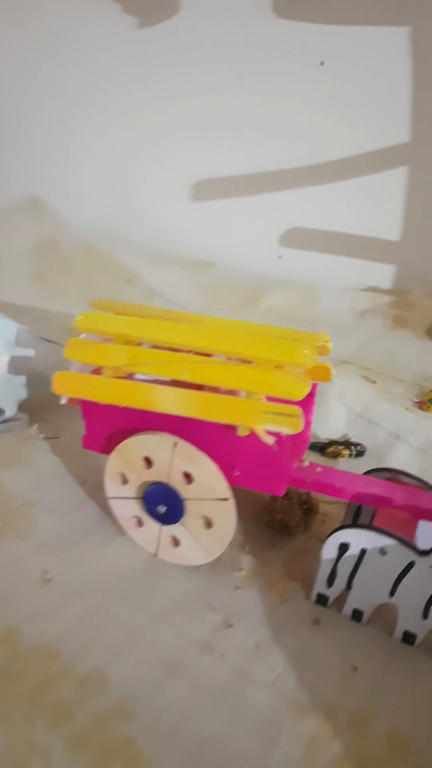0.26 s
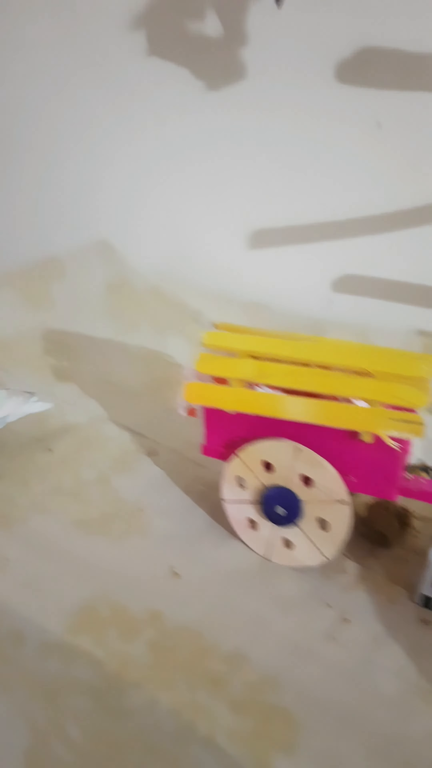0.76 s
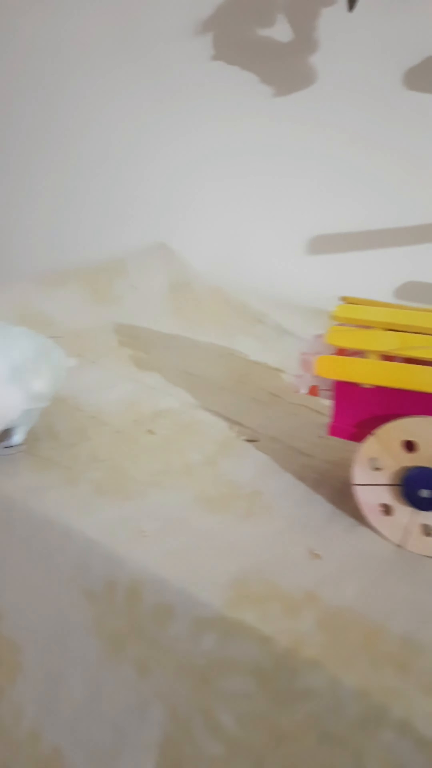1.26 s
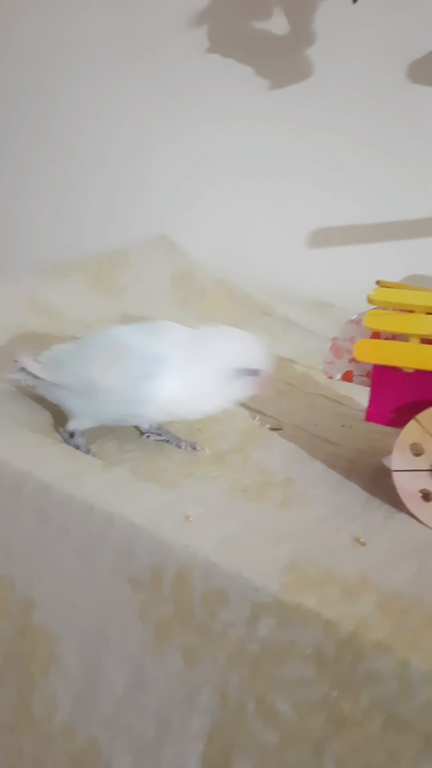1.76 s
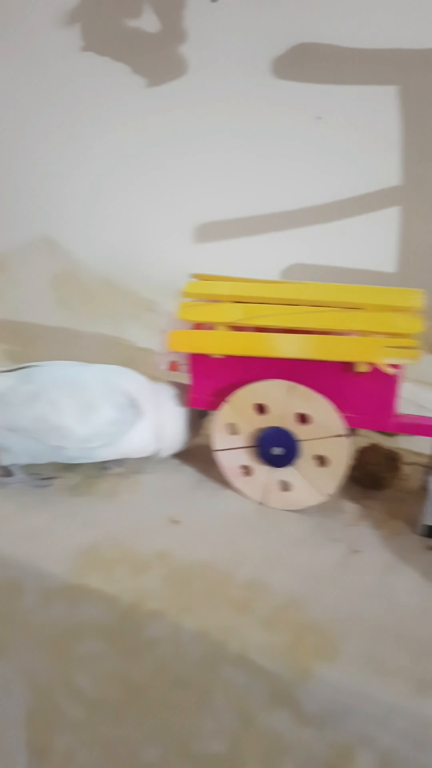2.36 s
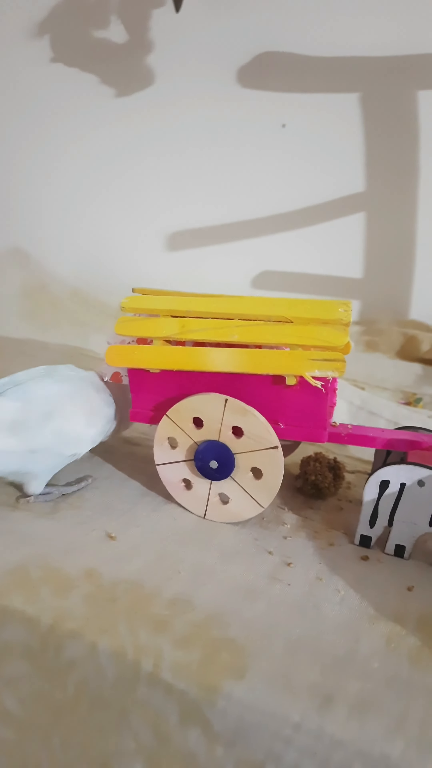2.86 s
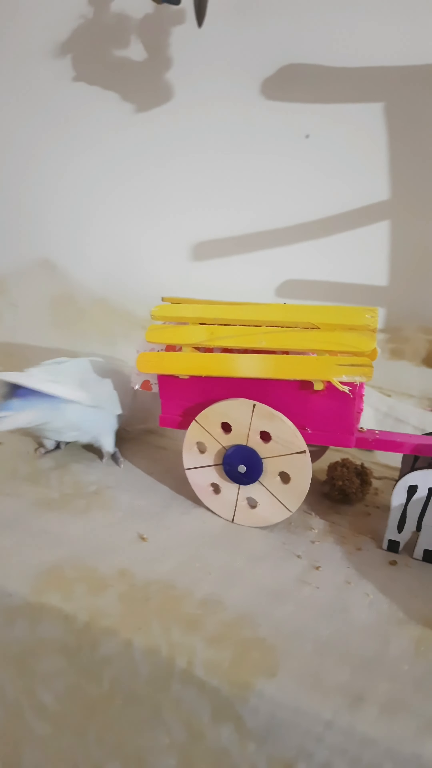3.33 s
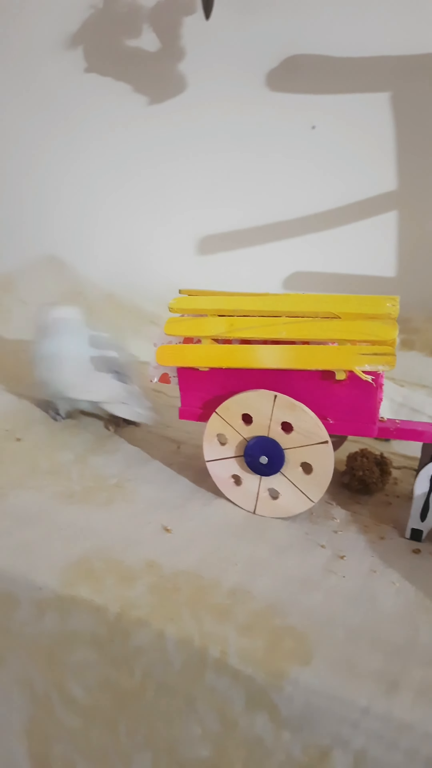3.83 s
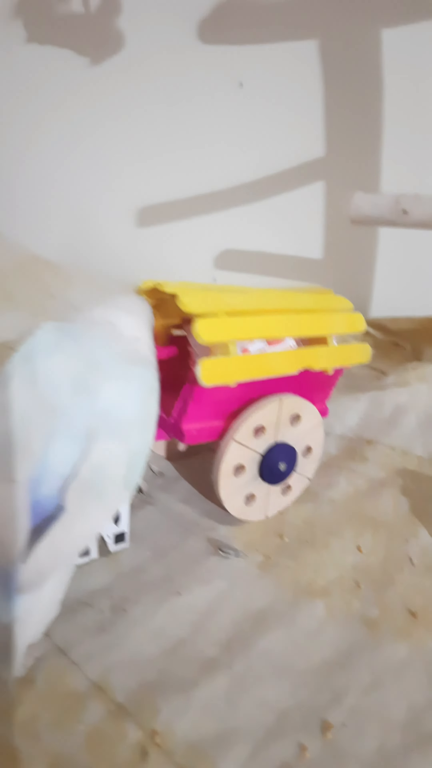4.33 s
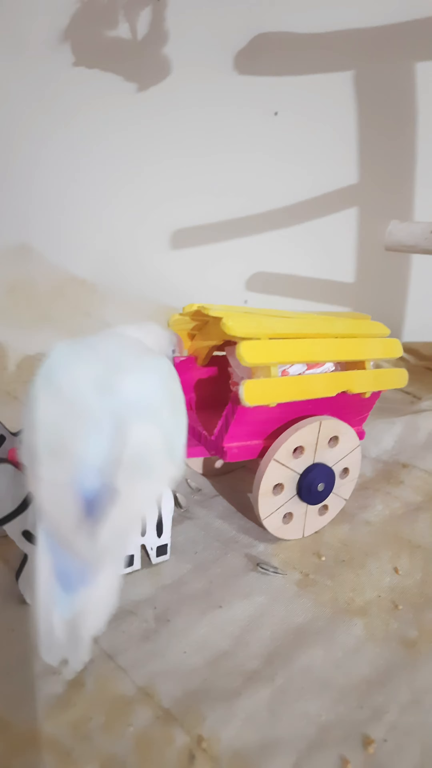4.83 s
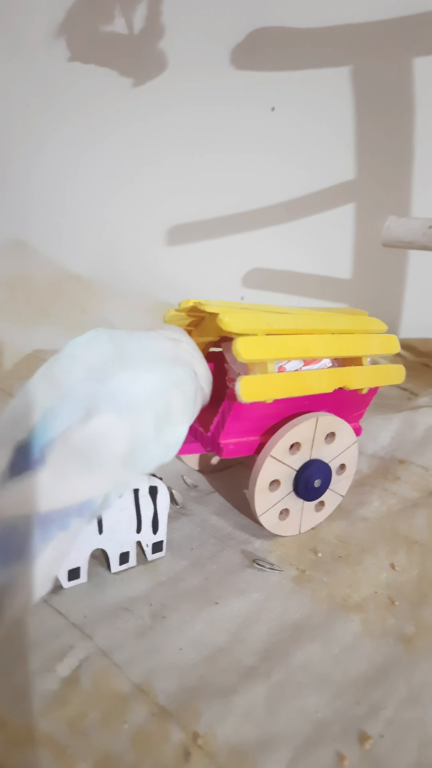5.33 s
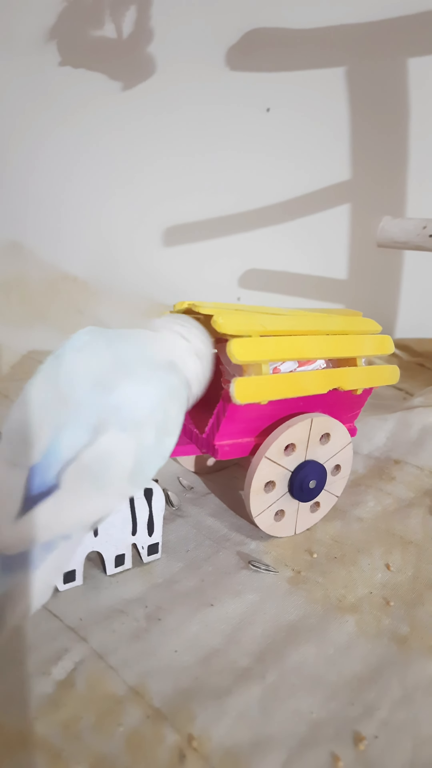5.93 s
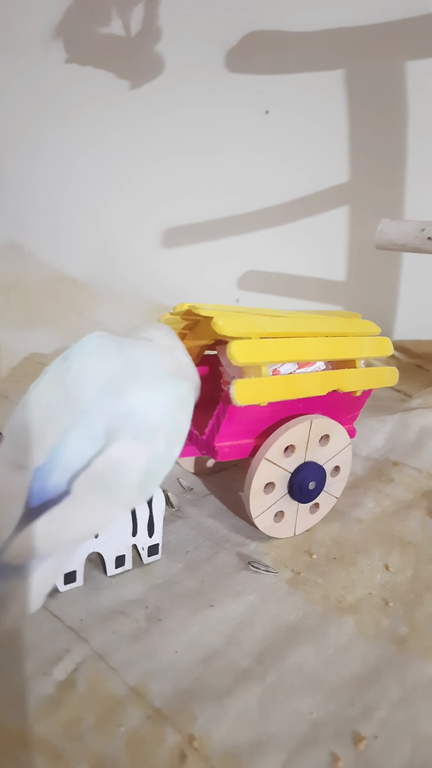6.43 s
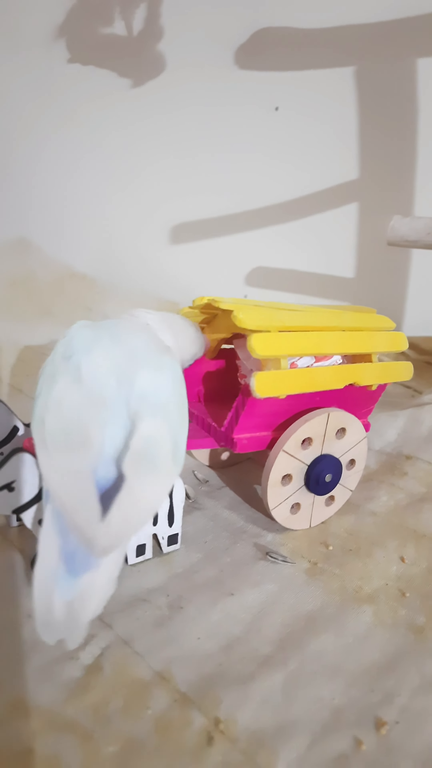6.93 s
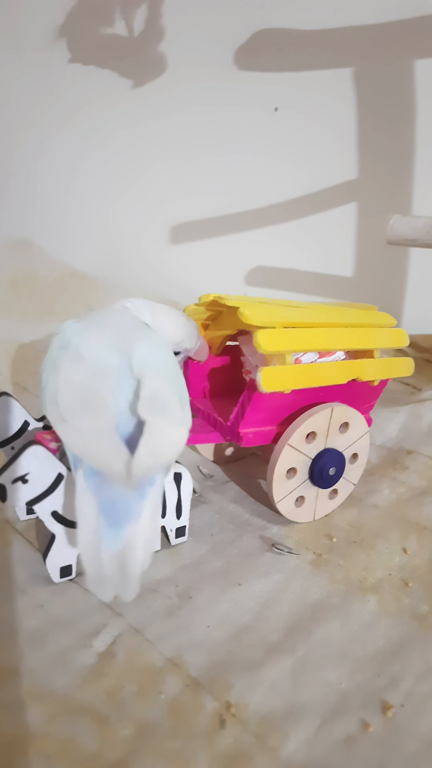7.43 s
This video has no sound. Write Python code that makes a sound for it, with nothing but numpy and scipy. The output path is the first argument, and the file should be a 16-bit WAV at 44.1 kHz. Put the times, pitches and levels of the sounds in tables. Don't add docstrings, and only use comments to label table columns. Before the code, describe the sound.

Small parrots shriek, pipe and chatter in a ringing bare room, then one bird gnaws thin wooden sticks with faint ticks and soft peeps.

```python
import sys
import numpy as np
from scipy import signal
from scipy.io import wavfile
from scipy.ndimage import uniform_filter1d, map_coordinates

SR = 44100
rng = np.random.default_rng(int(sys.argv[2]) if len(sys.argv) > 2 else 0)


def unload_audio(sound):
    columns = np.transpose(np.atleast_2d(sound))
    steps = np.round(np.clip(columns, -1, 1) * 32767)
    wavfile.write(sys.argv[1], SR, steps.astype(np.int16))


def makeup_ratio(level_db):
    decades = np.asarray(level_db, float) / 20
    return 10 ** decades


N = 339129
CHANGE_S = 3.998


def unit(x):
    return x / np.sqrt(np.mean(x ** 2))


def band(x, hz, width):
    return signal.lfilter(*signal.iirpeak(hz, hz / width, SR), x)


def walk(rate, size):
    hold = max(int(SR / rate), 1)
    steps = np.repeat(rng.standard_normal(size // hold + 1), hold)
    return 1.317 * uniform_filter1d(uniform_filter1d(steps, hold), hold)[:size]


def curve(rows, t):
    s, *columns = np.transpose(rows)
    return [np.interp(t, s, c) for c in columns]


def syrinx(rough, second_db, fall_db, rows, puff):
    t = np.arange(rows[0][0] - .002, rows[-1][0] + 0.0031 + 0.018 * rough, 1 / SR)
    hz, db = curve(rows, t)
    size = len(t)
    wavering_hz = uniform_filter1d(hz, size=SR // 500) * (1 + .012 * walk(150, size))
    phase = 2 * np.pi * np.cumsum(wavering_hz) / SR
    stack = 0
    for k in range(1, 7):
        smear = min(rough * (0.4 + .9 * k), 1)
        spread = hz.mean() * (.12 + .7 * rough ** 2) * k ** 0.64
        blur = walk(spread, size) * np.sin(k * phase) + walk(spread, size) * np.cos(k * phase)
        partial = np.sqrt(1 - smear) * np.sin(k * phase) + np.sqrt(smear / 2) * blur
        partial_db = (k > 1) * (second_db + fall_db * (k - 2))
        stack = stack + partial * makeup_ratio(partial_db) * (k * hz < 15300)
    pulse_phase = 2 * np.pi * np.cumsum(260 * (1 + 0.3 * walk(79.9, size))) / SR
    pulses = 1 + .8 * rough * np.sin(pulse_phase)

    hiss = unit(band(band(rng.standard_normal(size), 4500, 8000), 4500, 8000))
    air = makeup_ratio(-16.5 + 0.46 * second_db + 10 * rough) * hiss
    above_voice = signal.butter(4, 0.85 * hz.min(), "high", fs=SR, output="sos")
    air = signal.sosfilt(above_voice, air)
    air = air * (1 + puff * np.exp(-((t - t[0] - .008) / 0.0053) ** 2))

    opening = (t - t[0]) / (0.0012 + 0.0039 * rough)
    closing = (t[-1] - t) / (0.0017 + 0.011 * rough)
    edges = np.clip(np.minimum(opening, closing), 0, 1)
    ragged = makeup_ratio(5 * rough * walk(70, size))
    return np.sqrt(2) * makeup_ratio(db) * edges * pulses * ragged * (stack + air)


def add(out, x, s, lag):
    for side, shift in enumerate((lag / 2, -lag / 2)):
        start = max(int(s * SR + shift), 0)
        out[side, start:start + len(x)] += makeup_ratio(-.13 * shift) * x[:N - start]


def birds(calls):
    out = np.zeros((2, N))
    for voice, rows in calls:
        puff = voice.get("puff", 2.2)
        sound = syrinx(voice["rough"], voice["second_db"], voice["fall_db"], rows, puff)
        add(out, sound, rows[0][0] - .002, voice["lag"])
    return out


def contours(notes, peak, glided, onset_db, fade_db, **voice):
    calls = []
    for s, length, first, last, db in notes:
        onset = (s, first, db + onset_db)
        top = (s + peak * length, first + glided * (last - first), db)
        calls.append((voice, [onset, top, (s + length, last, db + fade_db)]))
    return calls


def sung(tables):
    return sum((contours(notes, **way) for notes, way in tables), [])


SHRILL = dict(rough=0.06, second_db=1.5, fall_db=-5.5, lag=-8.4, puff=1.5)
ROUNDED = dict(rough=0.22, second_db=3, fall_db=-13.5, lag=-8.4, puff=0)
SHOUT = dict(rough=.4, second_db=-9.5, fall_db=-5, lag=-8,
             peak=0.58, glided=0.77, onset_db=2.5, fade_db=-11.5)
# (time [s], pitch [Hz], level [dB])
SHRILL_CALLS = [
    [(.016, 2200, -33.5), (.022, 2223, -26.5), (.032, 2130, -24), (.042, 2300, -30)],
    [(.167, 2725, -25), (.171, 2355, -30), (.176, 2450, -18.5), (.18, 2910, -14), (.185, 3310, -18),
     (.193, 3660, -19), (.203, 2840, -24.5)],
    [(.208, 3290, -25), (.214, 2750, -24)],
]
# (time [s], pitch [Hz], level [dB])
ROUNDED_CALL = [(.045, 2720, -27.5), (0.053, 3290, -20), (.06, 3800, -21.5), (0.069, 3440, -25.5),
                (0.071, 3050, -28.5)]
# (time [s], length [s], first pitch [Hz],
# # last pitch [Hz], level [dB])
SHOUTS = [(0.08, 0.034, 3000, 3100, -25.5), (.002, 0.067, 4000, 3800, -37.5),
          (.221, 0.012, 6300, 5400, -18), (.233, .028, 4500, 4000, -15.5), (.2, .03, 4400, 2750, -23.5),
          (.235, .06, 2900, 2850, -30)]


def near_bird():
    shrieks = [(SHRILL, rows) for rows in SHRILL_CALLS]
    return birds(shrieks + [(ROUNDED, ROUNDED_CALL)] + contours(SHOUTS, **SHOUT))


RASPED = dict(rough=0.49, second_db=1, fall_db=-10, lag=2.8, puff=0)
CLACK = dict(rough=0.044, second_db=-19.5, fall_db=-15, lag=3, puff=9)
PIPING = dict(rough=0.078, second_db=-6, fall_db=-7.5, lag=3, puff=0)
SLIDING = dict(rough=0.15, second_db=-10.5, fall_db=-6.5, lag=6, puff=0)
# (time [s], pitch [Hz], level [dB])
RASPED_CALL = [(1.008, 5300, -41), (1.013, 5760, -37.5), (1.019, 5200, -41)]
# (time [s], pitch [Hz], level [dB])
CLACK_CALL = [(2.2609, 5240, -24.5), (2.263, 4210, -25.5)]
# (time [s], pitch [Hz], level [dB])
PIPING_CALLS = [
    [(1.02, 4150, -34), (1.024, 3980, -28.5), (1.031, 4010, -21.5), (1.039, 5080, -24), (1.046, 4650, -25),
     (1.053, 5190, -20.5), (1.06, 5118, -33)],
    [(1.077, 4130, -26), (1.088, 3950, -19.5), (1.1, 3975, -38)],
]
# (time [s], pitch [Hz], level [dB])
SLIDING_CALLS = [
    [(1.069, 3490, -32), (1.072, 2500, -16), (1.076, 2480, -34)],
    [(1.103, 3140, -23.5), (1.108, 2826, -20), (1.116, 2673, -26.5), (1.127, 1850, -27.5)],
    [(1.133, 1840, -33), (1.139, 1430, -35.5), (1.146, 1630, -49)],
]


def middle_bird():
    pipes = [(PIPING, rows) for rows in PIPING_CALLS]
    slides = [(SLIDING, rows) for rows in SLIDING_CALLS]
    return birds([(RASPED, RASPED_CALL), (CLACK, CLACK_CALL)] + pipes + slides)


FLUTED = dict(rough=0.2, second_db=-13, fall_db=-10, lag=9.6)
CLEAR = dict(rough=0.18, second_db=-7.5, fall_db=-9, lag=1.8,
             peak=0.4, glided=0.63, onset_db=2, fade_db=-1)
SOFT = dict(rough=0.276, second_db=-29, fall_db=-75, lag=3.9,
            peak=0.27, glided=0.626, onset_db=1.5, fade_db=-7.5)
HUSKY = dict(rough=0.52, second_db=-17.5, fall_db=-5.5, lag=9, puff=0.85,
             peak=0.39, glided=0.53, onset_db=7, fade_db=6)
HOARSE = dict(rough=.85, second_db=-15.5, fall_db=-18.5, lag=10, puff=.7,
              peak=0.62, glided=0.6, onset_db=-2.5, fade_db=-8.5)
SWELLING = dict(rough=.55, second_db=-38, fall_db=-19, lag=8.9, puff=0,
                peak=.7, glided=0.62, onset_db=-4, fade_db=-9)
WHISTLED = dict(rough=0.078, second_db=-13, fall_db=-2.5, lag=2, puff=0,
                peak=0.48, glided=.75, onset_db=-11, fade_db=-8.5)
CHIPPED = dict(rough=0.23, second_db=-10, fall_db=-12, lag=9, puff=1,
               peak=0.285, glided=0.88, onset_db=6, fade_db=-7)
CHATTY = dict(rough=0.16, second_db=4.5, fall_db=-5.5, lag=9, puff=4.2,
              peak=0.5, glided=.65, onset_db=-4, fade_db=-4)
# (time [s], pitch [Hz], level [dB])
FLUTED_CALL = [(1.793, 5500, -53), (1.798, 5284, -38.5), (1.808, 3533, -39), (1.818, 3645, -36),
               (1.834, 4720, -45), (1.838, 4560, -39), (1.848, 3664, -34.5), (1.858, 2500, -40)]
# (time [s], length [s], first pitch [Hz], last pitch [Hz], level [dB])
CLEAR_NOTES = [(1.635, 0.058, 1305, 1318, -56), (1.797, 0.069, 1141, 1720, -49.5),
               (2.005, 0.024, 966, 1310, -53), (2.207, 0.021, 2774, 3100, -42.5),
               (2.4, 0.0655, 1206, 1037, -54.5), (2.485, 0.078, 1060, 993, -57.5),
               (3.925, 0.078, 986, 946, -62)]
SOFT_NOTES = [(.5, 0.1, 1877, 1757, -50), (.66, 0.061, 2076, 1978, -51), (.8, 0.052, 1777, 1787, -52),
              (.9, 0.058, 1896, 1847, -52), (1.352, 0.026, 3600, 3670, -48.5),
              (1.46, 0.043, 2487, 2880, -52), (1.61, 0.019, 2200, 2255, -53.5), (2.05, 0.19, 819, 868, -62),
              (2.8, 0.036, 5580, 5700, -34)]
HUSKY_NOTES = [(.415, 0.036, 3560, 3570, -39), (1.14, 0.03, 3450, 3940, -35.5),
               (1.18, .025, 3750, 3767, -37), (1.175, 0.045, 1650, 2265, -40),
               (1.86, 0.035, 2294, 2570, -42), (1.91, 0.059, 2870, 2760, -55),
               (2.41, 0.067, 2390, 2300, -55), (2.53, 0.079, 2300, 2270, -59),
               (2.665, 0.108, 1683, 1770, -50), (2.905, 0.076, 2300, 1960, -44.5),
               (2.965, 0.017, 4610, 3450, -44), (3.92, 0.075, 3850, 3850, -71),
               (1.94, .04, 2850, 2750, -56)]
HOARSE_NOTES = [(.27, 0.1, 4180, 4730, -38.5), (.41, .05, 2472, 1800, -36.5), (.29, .1, 2900, 2703, -37.5),
                (.365, 0.1, 4600, 1850, -34.5), (1.19, 0.059, 5350, 5780, -33),
                (3.03, .105, 4117, 4720, -35.5), (3.03, 0.13, 1720, 2203, -42.5),
                (3.03, 0.1, 6200, 6640, -34), (3.04, 0.2, 2820, 2807, -39.5),
                (3.135, 0.28, 4600, 2415, -43.5), (3.2, 0.017, 4570, 4600, -38.5),
                (3.205, 0.039, 2198, 2860, -35.5), (3.29, 0.016, 3380, 4110, -60),
                (3.25, 0.25, 1616, 1520, -54), (3.79, 0.047, 1613, 1515, -53.5)]
SWELLING_NOTES = [(3.742, .03, 2600, 2500, -54), (3.77, .018, 3300, 4000, -46.5),
                  (3.767, 0.022, 1550, 1500, -41.5), (3.78, 0.0153, 3000, 2400, -49),
                  (3.325, 0.0507, 2500, 2150, -31.5), (3.37, 0.088, 2200, 2200, -40.5),
                  (3.1, 0.029, 3800, 3100, -45.5), (3.225, 0.054, 3100, 1800, -35)]
WHISTLES = [
    (2.035, .1, 1704, 1958, -38.5),
]
CHIPS = [(3.498, 0.013, 2750, 2950, -40), (3.508, 0.037, 2980, 2950, -42), (3.2, .012, 4800, 3700, -52),
         (3.53, .035, 2500, 2050, -53), (2.5, 0.0715, 1500, 1900, -50.5), (3.2, 0.036, 1400, 1700, -57),
         (3.74, .02, 1180, 1100, -55), (3.5, 0.073, 1850, 1980, -62), (3.1, .035, 2600, 2400, -60),
         (1.255, 0.027, 2950, 3400, -39), (1.31, 0.033, 2400, 2500, -45.5)]
# (time [s], length [s], top pitch [Hz], level [dB])
CHATTER = [(2.335, 0.014, 2240, -49), (2.391, 0.015, 2520, -45.5), (2.446, 0.019, 2330, -39.5),
           (2.509, 0.022, 2550, -40.5), (2.576, 0.019, 2447, -42), (2.657, 0.015, 2370, -42),
           (2.723, .022, 2367, -37.5), (2.787, 0.015, 2950, -38), (2.839, .011, 2600, -41.5),
           (2.9, 0.013, 2730, -38.5)]


def flock():
    chatter = [(s, length, 1500, top, db) for s, length, top, db in CHATTER]
    kinds = [(CLEAR_NOTES, CLEAR), (SOFT_NOTES, SOFT), (HUSKY_NOTES, HUSKY), (HOARSE_NOTES, HOARSE),
             (SWELLING_NOTES, SWELLING), (WHISTLES, WHISTLED), (CHIPS, CHIPPED), (chatter, CHATTY)]
    return birds([(FLUTED, FLUTED_CALL)] + sung(kinds))


def stick_resonances():
    """Placeholder name for the wood's modes is not needed: see stick()."""


# (frequency [Hz], width [Hz], level [dB])
STICK = [(2300, 880, 14.5), (4600, 1400, 8), (5970, 820, 3.5), (7920, 700, 5), (9780, 580, 7),
         (13100, 850, 3), (15000, 4700, -7)]


def stick(top, body):
    out = 0
    for k, (hz, width, db) in enumerate(STICK):
        drive = body if k < 2 else top
        out = out + (-1) ** k * makeup_ratio(db) * band(drive, hz, width)
    return out


# (time [s], peak level [dB], body 1.5-4 kHz minus top [dB], left minus right [dB])
TICKS = [(1.522, -55, -31, -18), (2.2213, -42, -2.5, 5), (3.4927, -48, 9, -13), (4.036, -57.5, -19, -5),
         (4.9681, -49, -27, 7), (4.9944, -61.5, -6.5, 4.5), (5.033, -58, -9, 4), (5.08, -61, -1, 5),
         (5.19, -63, -5, -1), (5.4794, -60.5, -14, -7.5), (5.6361, -59.5, -5, 1), (5.7294, -63, -11, -6.5),
         (5.891, -62, -2, -3), (5.96, -64, 4, -15), (5.999, -56, -12, -3), (6.0191, -50, -11.5, -17),
         (6.096, -61.5, -17.5, -20), (6.174, -48, -2.5, -11), (6.2128, -53, -9.5, -19),
         (6.2916, -59, -10, -20.5), (6.4774, -61, -4.5, -17), (6.4994, -50, -14, -23.5),
         (6.532, -46, -37, -19), (6.9572, -59, -15, 4), (7.1688, -58.5, -16, -5),
         (7.216, -58, -15.5, -16.5), (7.4715, -54, -13, -8), (7.5103, -56.5, -19, -7)]
# (time [s], length [s], level [dB], body minus top [dB])
TEAR = [(0.782, 0.036, -59.5, -5), (0.936, .03, -66, -21), (4.382, 0.059, -79.5, 5.5),
        (4.54, .05, -76, -3.5), (4.961, 0.14, -70, -11), (5.166, 0.088, -57, -11.5),
        (5.48, 0.12, -65.5, -11), (5.645, 0.025, -57.5, -1), (5.681, 0.13, -59.5, -10),
        (5.884, 0.017, -66, -9), (5.899, 0.15, -75.5, 5), (5.944, 0.0067, -70, -4),
        (6.066, 0.13, -64.5, -7.5), (6.168, 0.096, -71, 2), (6.402, 0.13, -64, -7), (6.512, .015, -61, -3),
        (6.527, 0.03, -48, -12.5), (6.568, 0.052, -59, -8), (6.63, 0.1, -63, -7.5), (6.95, .1, -68.5, -7),
        (7.184, 0.091, -61, -27), (7.46, 0.096, -69.5, -13.5)]
# (time [s], level [dB])
STIR = [(0, -41), (.72, -72), (.8, -74.5), (1.5, -65), (1.78, -67.5), (1.87, -50), (2.0, -57), (2.19, -70),
        (2.3, -54), (2.75, -54), (3.2, -52), (3.5, -60.5), (3.6, -63), (3.73, -68), (3.79, -54),
        (3.85, -63.5), (4.0, -67)]


def gnawing():
    t = np.arange(N) / SR
    top, body = np.zeros((2, N)), np.zeros((2, N))
    snap = np.exp(-np.arange(120) / 164.0)
    for s, db, body_db, pan_db in TICKS:
        port_db = db + 1.0 + np.array([[pan_db], [-pan_db]]) / 2
        burst = makeup_ratio(port_db) * snap * rng.standard_normal(120)
        at = slice(int(s * SR), int(s * SR) + 120)
        top[:, at], body[:, at] = burst, burst * makeup_ratio(body_db)

    struck = rng.random((2, N)) < 7000 / SR
    strength = makeup_ratio(np.minimum(1.8 * rng.exponential(size=(2, N)), 6))
    breaks = struck * strength * rng.standard_normal((2, N))
    breaks = unit(breaks + .6 * breaks[::-1]) * makeup_ratio(2.5 * walk(90, N))

    pull = (t < CHANGE_S) * makeup_ratio(curve(STIR, t)[0])
    pull_body = pull * makeup_ratio(1.0)
    for s, length, db, body_db in TEAR:
        at = slice(int(s * SR), int(s * SR) + SR // 2)
        age = t[at] - s
        thinning_db = 4.65 * np.clip(age / length, 0, 1) + 280 * np.clip(age - length, 0, 1)
        shape = np.clip(age / 0.0033, 0, 1) * makeup_ratio(db - thinning_db)
        pull[at] += shape
        pull_body[at] += shape * makeup_ratio(body_db)
    return stick(top + pull * breaks, body + pull_body * breaks)


PEEPY = dict(rough=0.332, second_db=-10.5, fall_db=-4, lag=4.5, puff=1.8,
             peak=0.297, glided=0.402, onset_db=-4, fade_db=-8.5)
REEDY = dict(rough=0.16, second_db=-4, fall_db=-3, lag=4.5, puff=2,
             peak=0.392, glided=.8, onset_db=0.5, fade_db=-1)
# (time [s], length [s], first pitch [Hz], last pitch [Hz], level [dB])
PEEPS = [(4.995, 0.077, 1400, 1400, -60), (5.17, 0.024, 1026, 1067, -58), (5.37, 0.075, 1362, 1364, -58),
         (5.7, 0.024, 1710, 1726, -53), (5.722, 0.089, 1663, 1400, -54), (5.888, 0.019, 1450, 1510, -52),
         (5.92, 0.029, 1500, 1520, -56), (5.96, 0.066, 1242, 1327, -53), (6.175, 0.016, 2035, 2254, -53),
         (6.18, 0.094, 2875, 2780, -61), (6.22, .06, 2150, 2150, -65.5), (6.53, 0.0251, 2650, 2330, -56),
         (6.545, 0.059, 1178, 1220, -52), (6.59, 0.049, 1380, 1440, -58)]
# (time [s], length [s], first pitch [Hz], last pitch [Hz], level [dB])
REEDY_PEEPS = [
    (5.634, 0.0214, 1017, 1132, -50.5),
    (5.65, 0.048, 1500, 1700, -54),
]


def gnawer_peeps():
    return birds(sung([(PEEPS, PEEPY), (REEDY_PEEPS, REEDY)]))


def ledge(x):
    return np.array([port + makeup_ratio(-6.5) * np.roll(port, lag) for port, lag in zip(x, (83, 131))])


# (frequency [Hz], decay by 60 dB [s], level [dB])
ROOM = [(731, 0.87, -6), (1400, 0.77, -6), (2000, 0.87, -7.5), (2650, 0.5, -3), (3400, 0.42, 1.5),
        (4450, 0.35, -7.5), (6230, 0.35, 1.5), (8870, 0.33, 4), (13130, 0.31, -5)]


def room(x, lag):
    t = np.arange(int(1.2 * SR)) / SR
    rise = np.clip((t - .003) / 0.0026, 0, 1)
    tail = 0
    for hz, t60, db in ROOM:
        ring = band(rng.standard_normal((2, len(t))), hz, .5 * hz) / np.sqrt(hz)
        tail = tail + makeup_ratio(db - 60 * t / t60) * ring
    tail = rise * (tail + .25 * tail[::-1])
    tail = np.array([np.roll(tail[0], lag), tail[1]])
    tail = tail / np.sqrt(np.sum(tail ** 2) / 2) / 2
    flutter = 8e-5 * SR * walk(200, N)
    wavering = map_coordinates(x[0], [np.arange(N) + flutter], order=1)
    return signal.fftconvolve(wavering[None], tail, axes=1)[:, :N]


# (frequency [Hz], level [dB per Hz])
HUSH = [(25, -47), (33, -45), (45, -25.5), (70, -16), (95, -22), (150, -13), (206, -26.5), (263, -7),
        (400, -30), (734, -28), (1740, -38.5), (2840, -54), (3500, -54.5), (6000, -55), (9000, -54),
        (16000, -63)]
# (time [s], level [dB])
DUCK = [(0, 3.5), (.3, -1.5), (.55, -3), (.95, -4), (1.3, -2), (1.7, -0.5), (2.3, 1), (3.2, 1.5),
        (3.7, -0.5), (7.69, -1)]
# (frequency [Hz], width [Hz], steady level [dB], wobbling level [dB])
HUM = [(64.1, 3, -14, -14), (119.4, 9, -28, -5), (130, 2.9, -0.5, -8), (235.6, 35, -21.5, -17)]
# (time [s], level [dB])
SWELL = [(0.0, -44), (0.41, -50.5), (2.93, -45), (3.08, -49), (6.87, -46.5), (7.13, -52), (7.69, -47)]


def house():
    t = np.arange(N) / SR
    out, swell = 0, walk(1.0, N)
    hush_hz, hush_db = np.transpose(HUSH)
    for hz in 25 * 2 ** np.arange(0, 9.4, .5):
        mid, side = band(band(rng.standard_normal((2, N)), hz, .5 * hz), hz, .5 * hz)
        db = np.interp(np.log(hz), np.log(hush_hz), hush_db) + 0.26 * swell + 0.24 * walk(2.1, N)
        width = np.clip(hz / 650, .22, 1)
        out = out + makeup_ratio(db) * (mid + width * side * np.array([[1], [-1]]))
    out = unit(out) * makeup_ratio(-48 + curve(DUCK, t)[0])
    beat = makeup_ratio(curve(SWELL, t)[0])
    for hz, width, steady_db, wobble_db in HUM:
        line = np.sqrt(2) * np.sin(2 * np.pi * hz * t + 2.1 * walk(0.99, N))
        wobble = unit(band(band(rng.standard_normal(N), hz, width), hz, width))
        out = out + beat * (makeup_ratio(steady_db) * line + makeup_ratio(wobble_db) * wobble)
    return np.array([np.roll(out[0], 10), out[1]])


def scene():
    near, middle, far = near_bird(), middle_bird(), flock()
    wood, peeps = gnawing(), gnawer_peeps()
    t = np.arange(N) / SR
    before = t < CHANGE_S
    wood_to_room = makeup_ratio(-4.5) * wood
    near_tail = room(makeup_ratio(-2) * near, -8)
    far_tail = room(middle + makeup_ratio(2) * far + wood_to_room, 9)
    toy_tail = room(makeup_ratio(-10) * peeps + wood_to_room * ~before, 9)
    tails = before * (near_tail + far_tail) + toy_tail
    dip = np.clip(np.abs(t - CHANGE_S) / 0.0097, .1, 1)
    return dip * (ledge(near + middle + far + peeps) + wood + tails + house())


def low_pass(x):
    return signal.sosfilt(signal.butter(12, 16300, fs=SR, output="sos"), x)


# (frequency [Hz], width [Hz], left share added [1], right share added [1])
PORT = [(6200, 2000, -0.42, -0.063), (9705, 2030, -0.61, -1.2), (12100, 620, 0.086, 0.25)]


def record(dry):
    mix = 2 * np.tanh(dry / 2)
    for hz, width, *share in PORT:
        mix = mix + np.clip(share, -1, 2)[:, None] * band(mix, hz, width)
    mix = signal.sosfilt(signal.ellip(8, .5, 60, 15900, fs=SR, output="sos"), mix)
    return low_pass(mix)


dry = scene()
out = record(dry)
unload_audio(out)
```